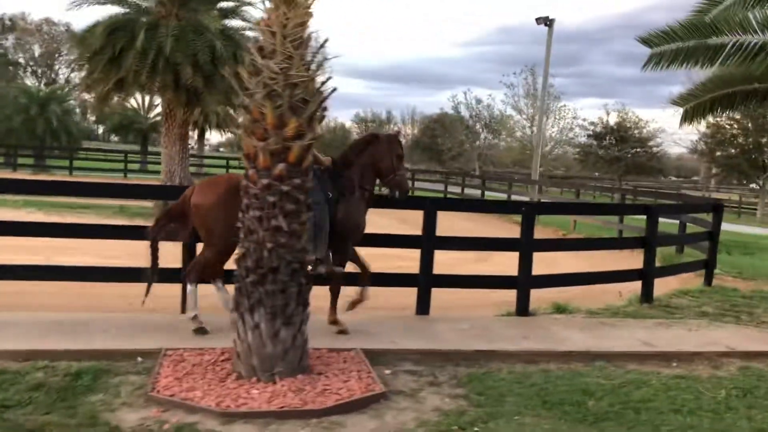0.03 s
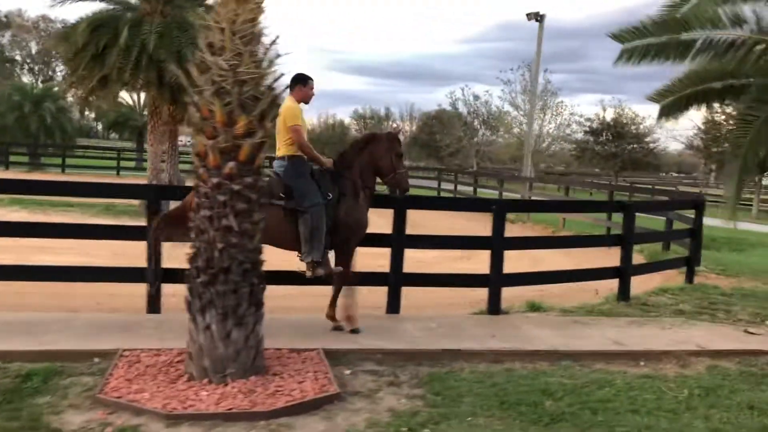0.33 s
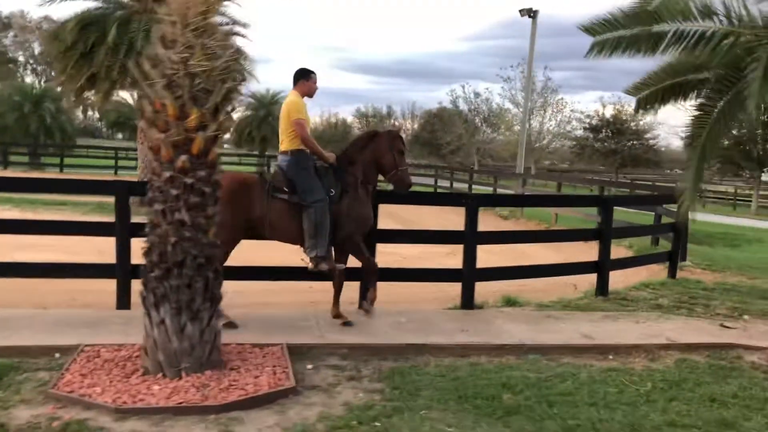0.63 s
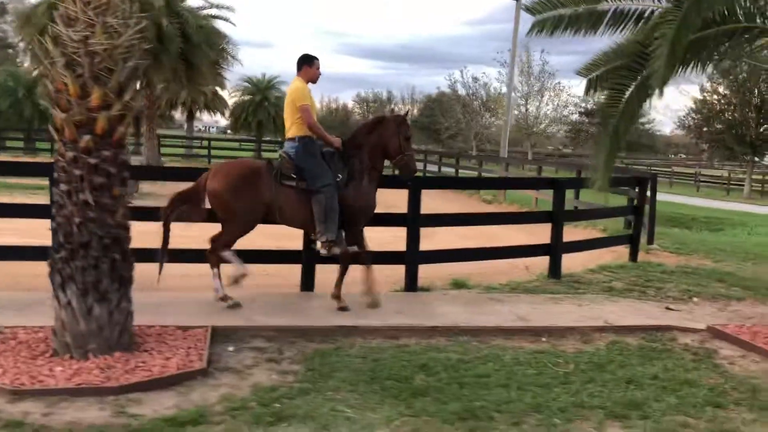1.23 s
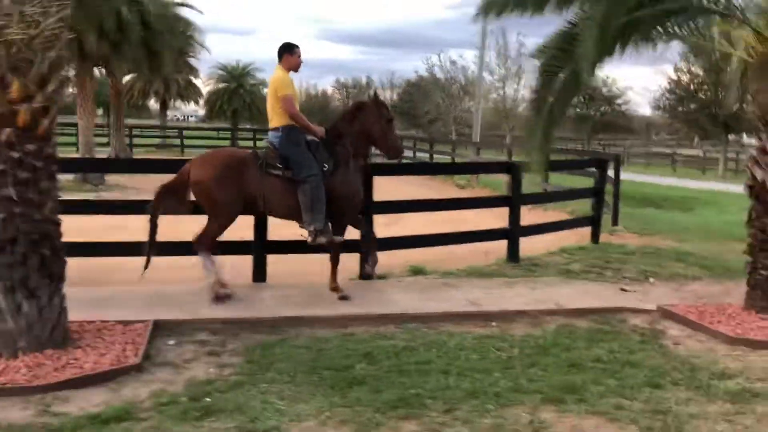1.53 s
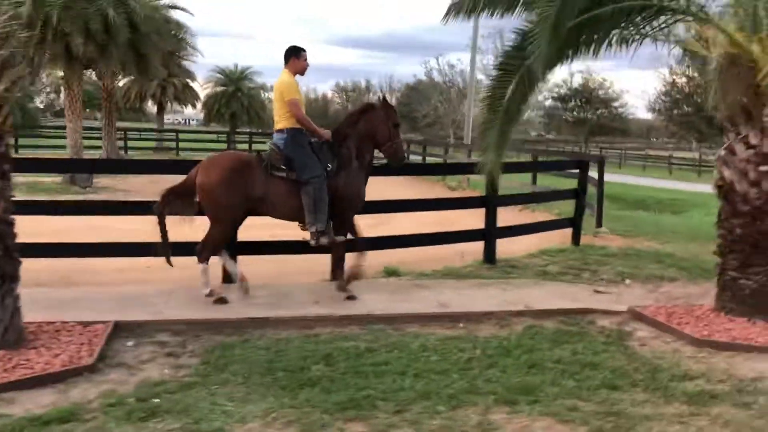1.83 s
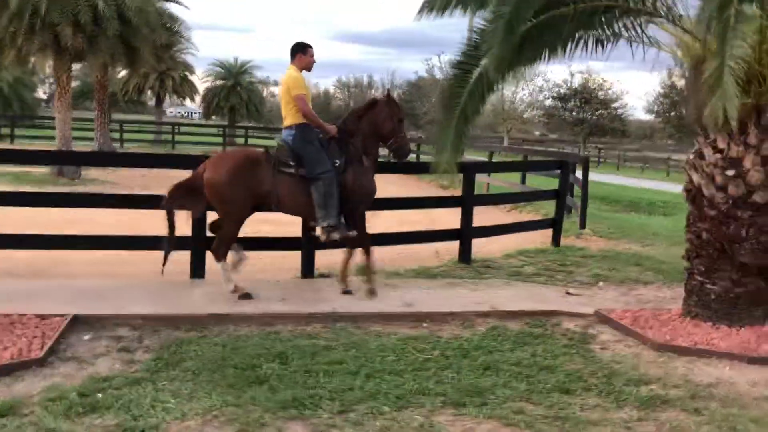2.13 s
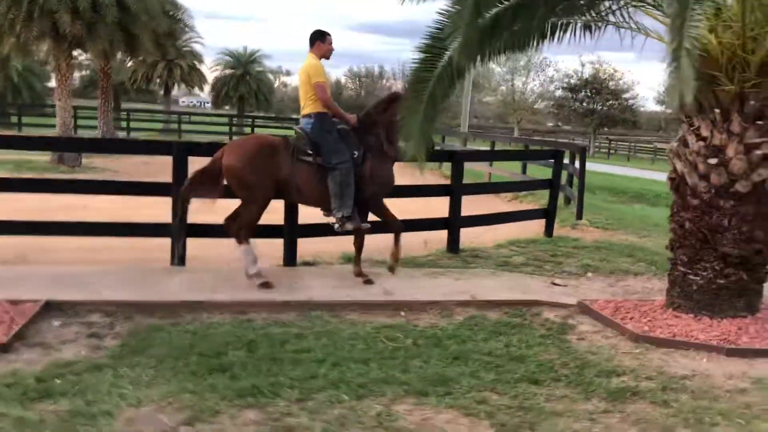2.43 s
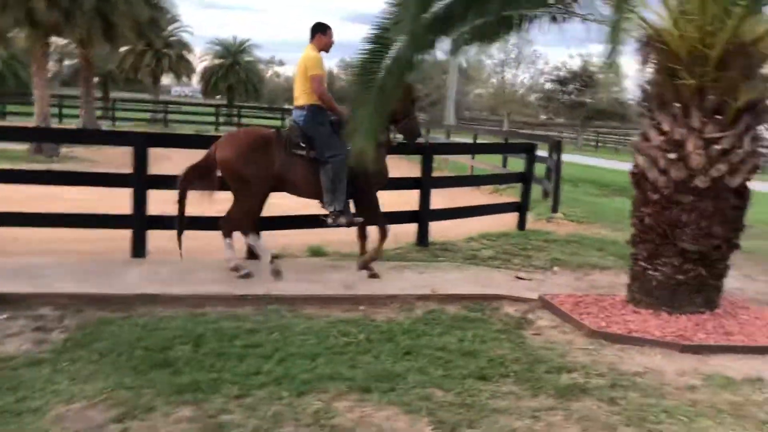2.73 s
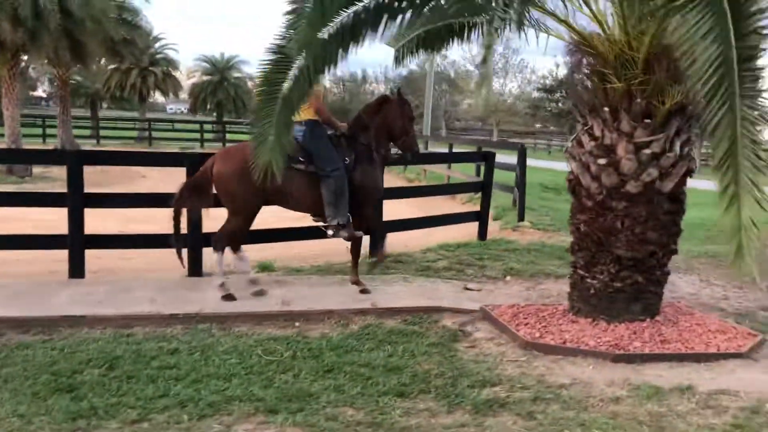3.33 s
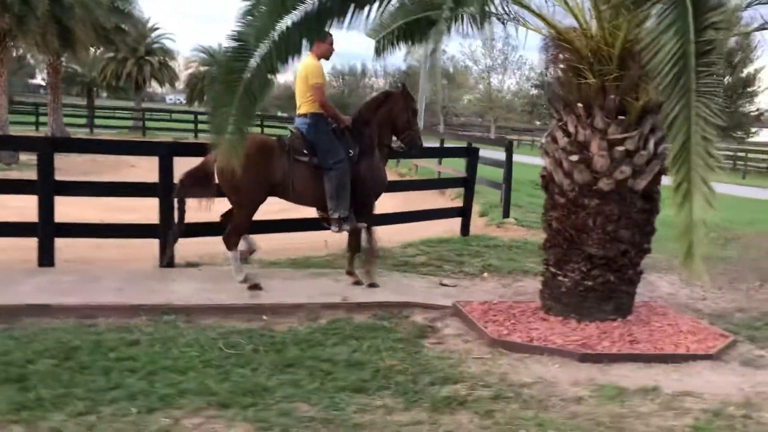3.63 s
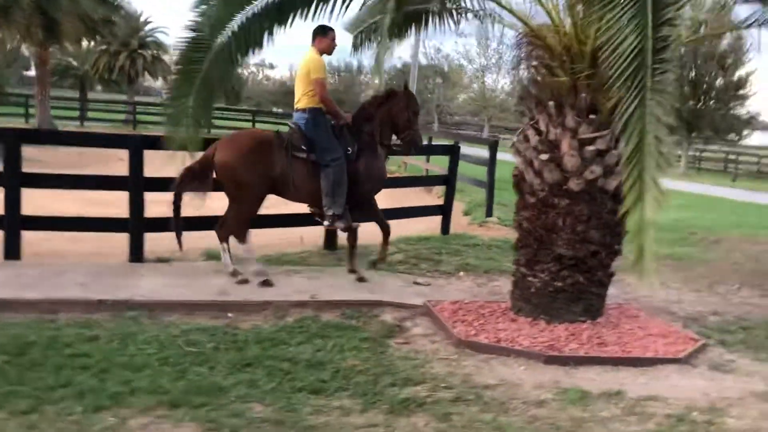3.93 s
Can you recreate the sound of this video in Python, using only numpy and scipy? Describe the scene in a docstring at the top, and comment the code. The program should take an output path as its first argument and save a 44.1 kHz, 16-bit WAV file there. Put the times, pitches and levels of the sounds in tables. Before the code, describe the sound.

A horse's hooves clip-clop quickly and evenly along a paved path outdoors.

```python
"""A paved path outdoors: a ridden horse moves along in a quick, even four-beat gait.
Bright clacks (often a toe tap, then the hoof slaps flat) alternate with deeper clops.
Grit crunches under the hooves and tack rings faintly, over a low rumble and hiss.
The bass of every blow arrives later than its treble, so each one sweeps quickly down into a thump."""
import sys
import numpy as np
from scipy import signal
from scipy.fft import rfft, irfft
from scipy.io import wavfile
from scipy.ndimage import uniform_filter1d

SR = 44100
rng = np.random.default_rng(int(sys.argv[2]) if len(sys.argv) > 2 else 0)


def pcm_store(signal):
    """Save signal as 16-bit PCM."""
    levels = np.round(np.clip(np.atleast_2d(signal), -1, 1) * 32767)
    wavfile.write(sys.argv[1], SR, levels.astype(np.int16).T)


N = 176400
SIZE = 16384  # samples per event
T = np.arange(SIZE) / SR
HZ = np.fft.rfftfreq(SIZE, 1 / SR)
RATTLE_S, RATTLE_HZ = 0.0062, 745  # contact noise: decay, high-pass corner


def amp(db):
    """Decibels to gain."""
    return 10 ** (np.asarray(db) / 20)


def read(points, hz):
    """Table lookup on a log-frequency axis."""
    f, value = np.transpose(points)
    return np.interp(np.log(hz + 1), np.log(f + 1), value)


def unit(x):
    """Scale to unit energy."""
    return x / np.sqrt(np.sum(x ** 2) + 1e-20)


def add(mix, start_s, sound):
    """Mix a sound in at start_s."""
    part = mix[max(round(start_s * SR), 0):][:len(sound)]
    part += sound[:len(part)]


def grains(spread_db):
    """Noise of grains of uneven strength."""
    return rng.standard_normal(SIZE) * amp(spread_db * np.minimum(rng.exponential(1, SIZE), 4))


def burst(decay_s):
    """Spectrum of a short noise burst."""
    return rfft(unit(rng.standard_normal(SIZE) * np.exp(-T / decay_s)))


def add_blow(mix, start_s, spectrum, lag_cycles=1.9, low_cut_hz=60):
    """Mix a spectrum in, each frequency late by about lag_cycles periods, deepest bass cut."""
    lag = np.exp(-2j * np.pi * lag_cycles * np.log(HZ + 15))
    low_cut = HZ ** 2 / (HZ ** 2 + low_cut_hz ** 2)
    lead_samples = 256
    add(mix, start_s - lead_samples / SR, np.roll(irfft(spectrum * lag * low_cut), lead_samples))


def air():
    """Low outdoor rumble and hiss."""
    # noise colour: f/Hz, level/dB
    colour = [(22, -39), (100, -10.5), (1100, -32.5), (7000, -47), (15000, -57.5)]
    gain = amp(read(colour, np.fft.rfftfreq(N, 1 / SR)) - 4)
    return irfft(rfft(rng.standard_normal(N)) * gain, N)


def scatter(x, level_db=-23, rise_s=0.0096, t60_s=0.65):
    """Faint reflections from fences and trees."""
    echo = unit(rng.standard_normal(SIZE) * (1 - np.exp(-T / rise_s)) * amp(-60 * T / t60_s))
    return amp(level_db) * signal.fftconvolve(x, echo)[:N]


def jingles(per_s=5, spread_s=0.03, t60_s=0.07, level_db=-57):
    """Buckles chatter at random times: four light touches ring their modes by chance amounts."""
    # buckle modes: f/Hz
    modes_hz = [7530, 8080, 10070, 12680]
    out = np.zeros(N)
    for start_s in rng.random(int(per_s * N / SR)) * N / SR:
        for delay_s in rng.random(4) * spread_s:
            ring = sum(rng.standard_normal() * np.sin(2 * np.pi * hz * rng.normal(1, 0.01) * T)
                       for hz in modes_hz)
            add(out, start_s + delay_s, ring * amp(level_db - 60 * T / t60_s))
    return out


def clinks():
    """Tack is struck as the horse lands: a tiny tick and a short ring."""
    # strikes: t/s
    times_s = [0.2787, 0.824, 1.3757, 1.8947, 2.102, 2.2615, 3.1598, 3.562, 3.7535, 3.952]
    # metal modes: f/Hz, level/dB, t60/s
    modes = [(7000, -30.5, 0.034), (9950, -31.5, 0.043), (12600, -42, 0.06)]
    high_pass = (HZ / (HZ + modes[0][0])) ** 2
    out = np.zeros(N)
    for start_s in times_s:
        ring = sum(amp(db + 2 * rng.standard_normal() - 60 * T / t60_s) * np.sin(2 * np.pi * hz * T)
                   for hz, db, t60_s in modes)
        tick = irfft(burst(RATTLE_S / 2) * high_pass)
        add(out, start_s, ring + 0.597 * tick)
    return out


def crunch(envelope, clump_s=0.0025, clump_db=3.5):
    """Spectrum of crushed sand: fine grains in clumps, each clump with its own pitch range."""
    # sand colour: f/Hz, level/dB
    colour = [(300, -36), (1500, 4.5), (5000, 5.5), (9000, -4.5), (15000, -10.5)]
    centres_hz = np.geomspace(1000, 16000, 6)
    knots_s = np.arange(0, T[-1], clump_s)
    shared = rng.standard_normal(len(knots_s))
    out = 0
    for pick in np.eye(len(centres_hz)):
        band = np.sqrt(read(np.c_[centres_hz, pick], HZ))
        clumps = amp(clump_db * np.interp(T, knots_s, shared + rng.standard_normal(len(knots_s))))
        out = out + rfft(unit(grains(spread_db=6) * clumps * envelope)) * band
    return out * amp(read(colour, HZ))


def grit(db, peak_s=0.025, width_s=0.015):
    """Spectrum of sand crunching as the weight comes onto a hoof."""
    return crunch(np.exp(-((T - peak_s) / width_s) ** 2)) * amp(db)


def scrapes():
    """A hoof drags briefly over grit."""
    # slides: t/s, length/s, level/dB
    slides = [(3.04, 0.075, -31), (3.56, 0.022, -31), (3.86, 0.022, -29)]
    out = np.zeros(N)
    for start_s, length_s, db in slides:
        swell = np.sin(np.pi * np.minimum(T / length_s, 1))
        add_blow(out, start_s, crunch(swell) * np.linalg.norm(swell) * amp(db))
    return out


def knocks(centre_hz=1890):
    """Small woody knocks between steps."""
    # knocks: t/s, level/dB
    hits = [(1.1078, 12), (1.2905, 4.5)]
    band = np.exp(-np.log2((HZ + 1) / centre_hz) ** 2)
    out = np.zeros(N)
    for start_s, db in hits:
        add_blow(out, start_s, burst(RATTLE_S) * band * amp(db))
    return out


def hum(db, t60_s=0.19):
    """Spectrum of the low ring that lingers after a clack."""
    hz = 114 * (1 + 0.033 * rng.standard_normal())
    return rfft(amp(db - 60 * T / t60_s) * np.cos(2 * np.pi * hz * T))


def cavity(spread_db=3, spacing_oct=0.17, from_hz=400):
    """Minimum-phase resonances of the cavity under a hoof, different at every step."""
    knots_hz = np.geomspace(100, 20000, int(7.6 / spacing_oct))
    depth_db = spread_db * knots_hz ** 2 / (knots_hz ** 2 + from_hz ** 2)
    gain = amp(rng.standard_normal(len(knots_hz)) * depth_db)
    gain /= np.sqrt(uniform_filter1d(gain ** 2, size=9))
    log_gain = np.log(read(np.c_[knots_hz, gain], HZ))
    mirrored = np.r_[log_gain, log_gain[-2:0:-1]]
    return np.exp(np.conj(signal.hilbert(mirrored)))[:len(HZ)]


def cup(centre_hz=1059, spread_oct=0.45, width_hz=90):
    """Resonance of the air cupped under the sole; its pitch varies by step."""
    hz = centre_hz * 2 ** (spread_oct * rng.uniform(-0.92, 1))
    damping = 1j * HZ * width_hz
    return 1 + amp(-1) * damping / (hz ** 2 - HZ ** 2 + damping)


def tail(rise_s=0.0013, patch_s=0.005, patch_db=3.4):
    """Spectrum of the patchy rattle and reflections after a blow; the bass lasts longest."""
    # decay times: f/Hz, t60/s
    decay = [(100, 0.33), (300, 0.089), (2000, 0.11), (12000, 0.085)]
    noise = rfft(grains(spread_db=5))
    centres_hz = np.geomspace(60, 15360, 9)
    knots_s = np.arange(0, T[-1], patch_s)
    out = 0
    for hz, pick in zip(centres_hz, np.eye(len(centres_hz))):
        band = read(np.c_[centres_hz, pick], HZ)
        flicker_db = np.interp(T, knots_s, rng.standard_normal(len(knots_s))) * patch_db * (hz > 400)
        envelope = (1 - np.exp(-T / rise_s)) * amp(flicker_db - 60 * T / read(decay, hz))
        out = out + unit(irfft(noise * band) * envelope) * np.linalg.norm(irfft(band))
    return rfft(out)


def toe_taps(top_hz=5300):
    """The toe's dull first touch, just before a clack."""
    # touches: t/s, level/dB
    taps = [(0.6171, 10), (0.8026, 5.5), (0.9855, 10), (1.1625, 10.5), (1.519, 12.5), (1.7031, 8),
            (2.0676, 9), (2.2515, 11.5), (2.5895, 7.5), (2.7866, 12), (3.343, 8), (3.5421, 10.5)]
    # tap colour: f/Hz, level/dB
    colour = [(60, 4), (200, 23), (500, 5), (1200, 5.5), (4500, -18)]
    low_pass = 1 / np.sqrt(1 + (HZ / top_hz) ** 8)
    out = np.zeros(N)
    for start_s, db in taps:
        add_blow(out, start_s, cavity() * (1 + tail() / 2) * low_pass * amp(db + read(colour, HZ)))
    return out


def hoof(colour, bands_db, tail_db, rattle, crush_hz=2200, crush_s=0.0011):
    """Spectrum of a hoof meeting the paving: a sharp, rattling contact and its tail."""
    # centres of boom, thud, knock, crack, snap: f/Hz
    bands_hz = [100, 260, 1000, 3500, 10000]
    # tail colour: f/Hz, level/dB
    tail_colour = [(35, -40), (70, 38.5), (120, 39), (235, 30.5), (490, 14), (1050, 13.5), (2600, 5),
                   (4700, -6.5), (9000, -57)]
    ragged = rattle * HZ / (HZ + RATTLE_HZ)
    contact = np.sqrt(1 - ragged ** 2) + ragged * burst(RATTLE_S)
    crush = HZ / (HZ + crush_hz)  # sand under the shoe smears the treble
    contact *= np.sqrt(1 - crush ** 2) + crush * burst(crush_s)
    step_db = read(np.c_[bands_hz, bands_db], HZ)
    contact *= amp(read(colour, HZ) + step_db)
    bass = 1 / (1 + (HZ / 500) ** 2)
    after_db = read(tail_colour, HZ) + 0.59 * bass * step_db + (1 - bass) * tail_db
    return cavity() * cup() * (contact + tail() * amp(after_db))


def clops():
    """The deeper hoof falls, each with its grit."""
    # falls, relative to the usual blow: t/s, boom/dB, thud/dB, knock/dB, crack/dB, snap/dB,
    # tail/dB, grit/dB
    falls = [(0.1461, -11, -8.5, -1.5, -6, -27, -1.5, 2), (0.3165, -0.5, 6.5, 5, -13, -28, 6, 7.5),
             (0.516, -0.5, -5.5, -3, -5, -8, 1, 4.9), (0.691, 3.5, -2.5, -5, 4.5, -15, 5.5, 8.7),
             (0.874, 4.5, -0.5, 6, -0.5, -7, 1.5, 5.5), (1.055, -0.5, 7, 8, 12, -4, 5, 20),
             (1.2474, -8.5, -8, -1, -11, -1, 2.5, 16), (1.4176, 3, 5.5, 10.5, 3, -2, 5, 9.5),
             (1.6156, -1, 4, 2, 3, -10, 1.5, 10), (1.78, -2.5, 3, -19, -8.5, 1, 1, 14.5),
             (1.948, 1.5, 4, 7.5, -1, -1, 1.5, 17), (2.1317, 1, 10.5, 10, 8.5, -3, 9, 10),
             (2.325, 4, -1, -8, -7.5, 4.5, -2.5, 9), (2.5096, 0.5, 8, 5, -0.5, -2, 1, 8),
             (2.659, 0.5, 1.5, 7, -14, 8, -1, 13), (2.8492, -5, -0.5, 3, -2, 0, 0, 13),
             (3.032, -0.5, 1, 5.5, -19, 9, -3.5, 18), (3.2266, -1, 5.5, 7, -1, -6, -1, 15.3),
             (3.4147, -1.5, -3.5, 7, -7.5, -4, 0.5, 13), (3.616, 4.5, 0.5, 9, 3.5, -21, 0.5, 5.5),
             (3.8405, 1.5, -5, -5.5, -10, -4, -1, 8.7)]
    # contact colour: f/Hz, level/dB
    colour = [(35, 25), (70, 37), (120, 42.5), (230, 36), (350, 24.5), (520, 9.5), (950, 13), (2200, 10),
              (4500, 6), (7500, -9.5), (15000, -21.5)]
    out = np.zeros(N)
    for start_s, *bands_db, tail_db, grit_db in falls:
        add_blow(out, start_s, hoof(colour, bands_db, tail_db, rattle=0.61))
        add_blow(out, start_s, grit(grit_db - 22.5))
    return out


def clacks():
    """The bright hoof falls, with grit and a low ring, plus a few short extra slaps."""
    # falls, relative to the usual blow: t/s, boom/dB, thud/dB, knock/dB, crack/dB, snap/dB, tail/dB
    falls = [(0.0451, 4, 10.5, 2.5, 1.5, -23, 9.5), (0.2442, -11.5, -2, 0, 7, 9.5, 2),
             (0.4275, -24, 1, 2.5, -6, 1, 7), (0.6234, 10.5, -3, 1, 10, 2.5, 4.5),
             (0.812, -2.5, 0, -0.5, 1, -11, -5), (0.9928, -7, -6, 2, 3.5, 5.5, 6.5),
             (1.169, -2.5, 4.5, 4.5, -4, 1, 3), (1.3482, 5.5, -6.5, 2, 5.5, 7, 3),
             (1.5246, 6, 1.5, 12, 4, 16, 1), (1.7099, -5, 15, 1, -6.5, 5, -8.5),
             (1.8816, -10, -6, 1.5, -0.5, -15, 4.5), (2.073, 7, 0, 5, 3.5, 9.5, 0.5),
             (2.2592, -2, 0, 4, -12.5, -9, -3), (2.4037, 4, -6.5, 5.5, 8, 8, 3.5),
             (2.598, 0.5, -2, -1.5, -5, 7.5, -6), (2.7925, 4, 12, -13, 5, 11, -2.5),
             (2.969, -9, 7, -0.5, -12.5, 4, 2.5), (3.142, -5, -22, 5, 0.5, 9.5, -1.5),
             (3.351, -1, -1, -6, -7.5, 0, -12), (3.549, 8.5, -8, 2.5, -3, 7, -1),
             (3.729, 0, 1.5, -8, -10, -13, 7), (3.9299, -8.5, -34, -9, -9, -9, -6.5)]
    # the hoof coming flat just after the toe touches, or another quick contact: t/s, level/dB
    slaps = [(0.0528, 1), (0.4357, -0.5), (1.892, 0.5), (2.2646, -5.5), (2.9719, -4.5), (3.5558, -8),
             (3.739, -3), (3.865, -11)]
    # contact colour: f/Hz, level/dB
    colour = [(35, -55), (70, 3.5), (120, 38.5), (220, 27), (480, 13.5), (1300, 14), (2200, 14.5),
              (3600, 16), (5000, 8), (15000, -25)]
    out = np.zeros(N)
    for start_s, *bands_db, tail_db in falls:
        boom_db, _, _, crack_db, _ = bands_db
        rattle = np.clip(0.76 - 0.02 * crack_db, 0, 1)  # flat landings crack, weaker ones are ragged
        add_blow(out, start_s, hoof(colour, bands_db, tail_db, rattle))
        add_blow(out, start_s, grit(tail_db / 2 - 7))
        add_blow(out, start_s, hum(boom_db / 2 - 20.5))
    for start_s, db in slaps:
        slap = burst(RATTLE_S / 2) * cavity() * HZ / (HZ + RATTLE_HZ)
        add_blow(out, start_s, slap * amp(db + read(colour, HZ)))
    return out


def scene():
    """The horse in the open air, mono."""
    horse = clacks() + clops() + toe_taps() + knocks() + scrapes() + clinks() + jingles()
    return (horse + scatter(horse) + air())[None]


def record(dry):
    """Soft peak limit, then a 16 kHz low-pass."""
    limited = dry / (1 + dry ** 8) ** (1 / 8)
    low_pass = signal.firwin(255, 16000, window=("kaiser", 9), fs=SR)
    return signal.oaconvolve(limited, low_pass[None], "same")


dry = scene()
out = record(dry)
pcm_store(out)
```